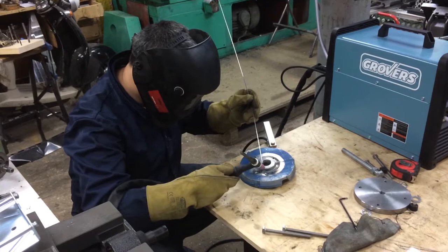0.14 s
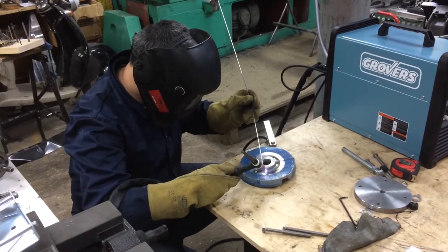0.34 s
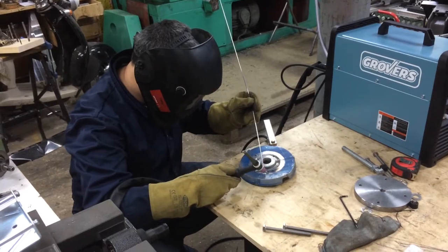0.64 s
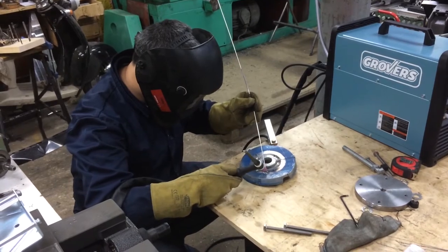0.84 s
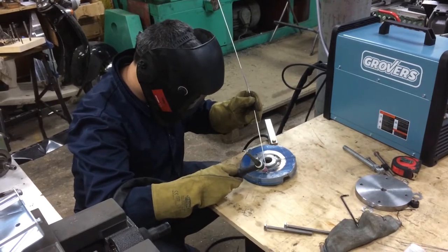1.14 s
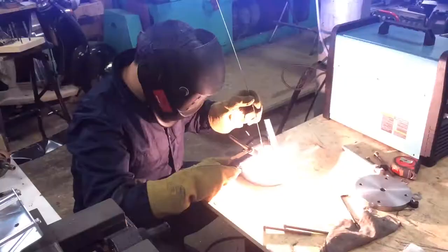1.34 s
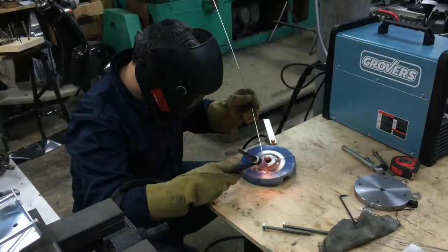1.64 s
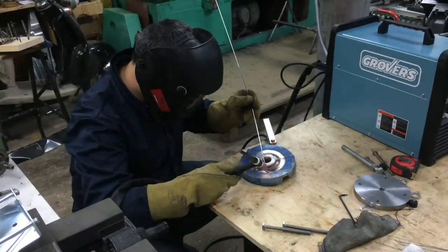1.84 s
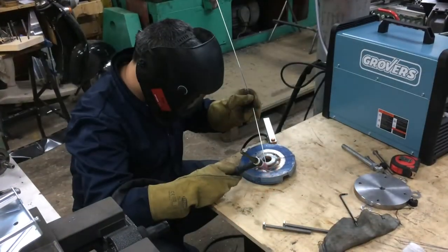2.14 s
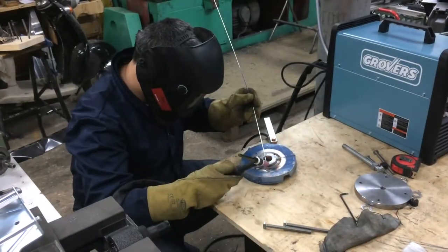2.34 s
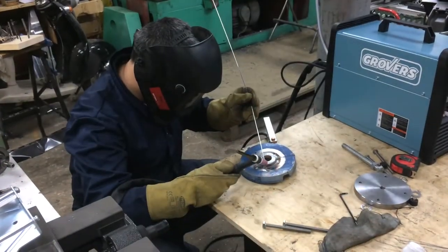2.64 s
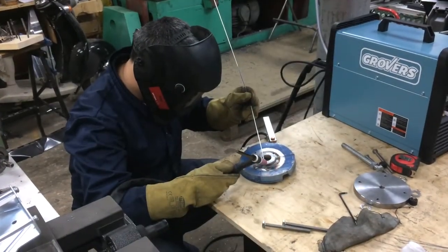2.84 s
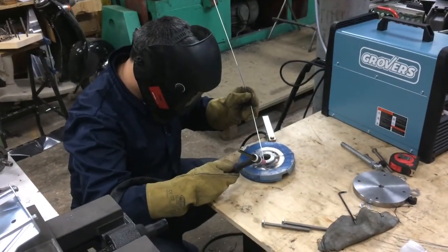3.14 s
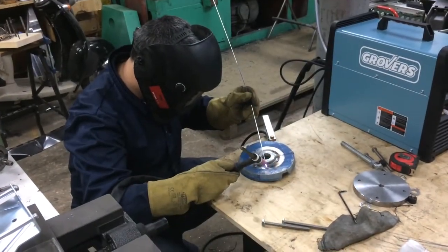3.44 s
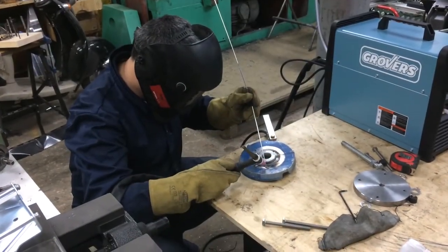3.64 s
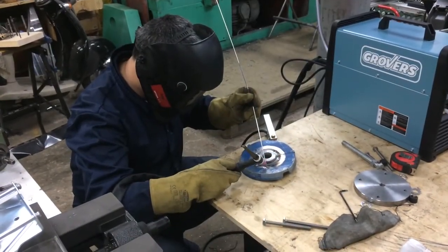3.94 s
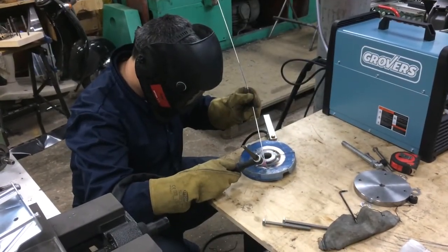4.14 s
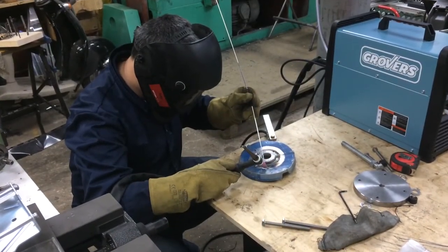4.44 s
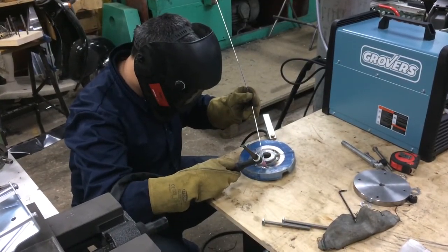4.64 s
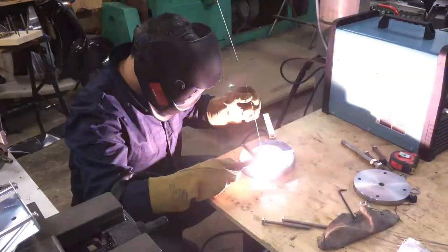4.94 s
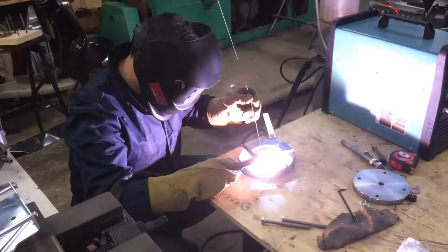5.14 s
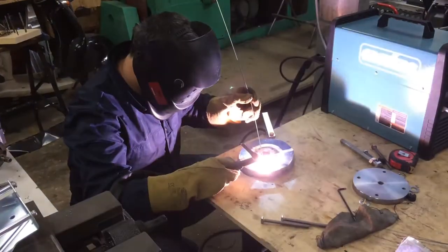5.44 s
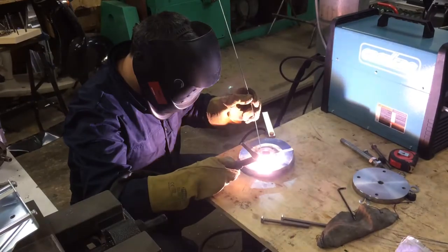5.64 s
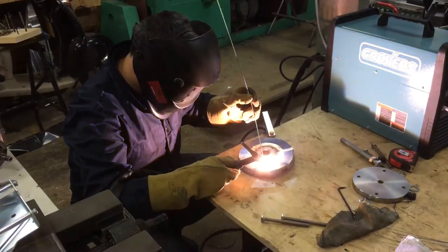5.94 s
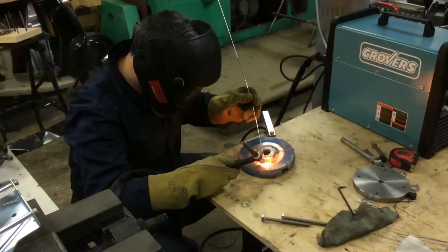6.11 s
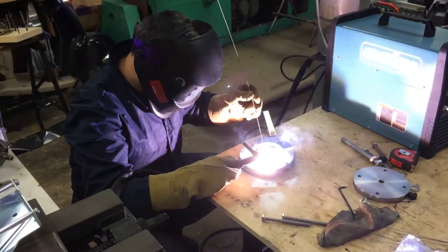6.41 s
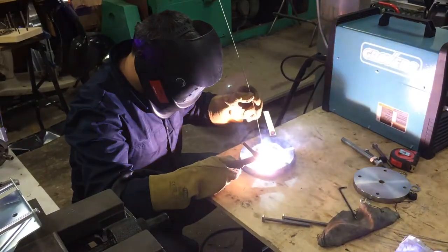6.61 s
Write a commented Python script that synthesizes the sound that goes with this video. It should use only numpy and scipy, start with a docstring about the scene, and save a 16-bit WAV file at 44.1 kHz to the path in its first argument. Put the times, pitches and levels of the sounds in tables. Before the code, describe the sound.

A welding machine's fan rushes softly with a low steady hum throughout, in a workshop with short reflections. From the start a thin, high igniter fizz pulses rapidly, and at 0.67 s eleven sharp bright sparks rattle out in under 0.2 s, leaving a faint low boom. A tick comes at 1.3 s; at 1.65 s an arc flares and sputters in low, ringing pops for a tenth of a second, then dies. Fizz returns at 1.8-2.0 s and 2.9-3.9 s, with a second spark rattle at 3.76 s. Near-quiet follows until a dull spit at 5.1 s and a hissing flare at 5.16 s. At 5.34 s the arc swells into a loud, raspy 70-per-second buzz with nasal ringing around 1-1.5 kHz, hiss and growing snaps. It breaks at 6.4 s, leaving faint whistling ticks, bursts back brighter at 6.58 s, and cuts out at 6.82 s.

```python
"""A workshop bench with a TIG welder, one microphone nearby; the cooling fan and a steady hum run throughout.
The igniter fizzes as bursts of bright noise and twice throws a string of sparks, each a single shock.
A first arc flares up, sputters in low ringing pops and dies. Then the arc catches with a hiss of noise and
buzzes on alternating current: each reversal kicks the gas, snaps and rings the power stage.
It sinks to a low current for a moment and returns. Ticks, spits and echoes off bench and room surround it."""
import sys
import numpy as np
from scipy import signal
from scipy.fft import rfft, irfft
from scipy.io import wavfile
from scipy.ndimage import uniform_filter1d

SR = 44100
rng = np.random.default_rng(int(sys.argv[2]) if len(sys.argv) > 2 else 0)


def store_wav(level_fs):
    """Save 16-bit WAV to argv[1]."""
    pcm = np.round(np.clip(np.atleast_2d(level_fs), -1, 1) * 32767)
    wavfile.write(sys.argv[1], SR, pcm.T.astype(np.int16))


N = 298557  # length in samples

# Burns at full current. Each row: start in seconds, end in seconds, swell in seconds, buzz in dB, snap in dB.
BURNS = [(5.344, 6.408, 0.063, 1.08, -40.5), (6.575, 6.82, .004, 2.5, -38.5)]
# Brief surges and dips of the buzz. Each row: middle in seconds, half length in seconds, change in dB.
SURGES = [(5.42, 0.031, 3), (5.715, 0.024, 1.5), (5.81, 0.08, -2), (6.04, 0.054, 2.2), (6.611, .007, -5.5)]
# Resonances that colour the buzz. Each row: centre in Hz, width in Hz, level in dB.
BUZZ_MODES = [(614, 57, -16.5), (930, 80, 0.5), (1150, 63.5, 2), (1478, 39.7, 4), (1952, 73, -3.5),
              (2214, 23, -6.5), (3560, 190, -26)]
# Spectrum of the stirred shielding gas. Each row: frequency in Hz, relative density in dB per Hz.
TURBULENCE_COLOUR = [(40, -31), (200, -5.5), (400, 0), (700, 2.5), (1050, 13.5), (2000, -13), (4000, -30),
                     (12000, -48)]
# Spectrum of the relighting snaps. Each row: frequency in Hz, relative density in dB per Hz.
SNAP_COLOUR = [(60, -58), (600, -34), (2000, 6), (3400, 0.5), (4200, -4), (5500, 0), (7500, -0.5),
               (9000, -1.5), (10500, 0.5), (13000, -1.5), (15000, -10)]
# Whistles of the power stage. Each row: centre in Hz, width in Hz, relative level in dB.
INVERTER_MODES = [(1200, 620, -8.5), (5274, 19, 9.5), (5740, 81, -5), (5910, 130, -6.5), (7100, 88, -10),
                  (7970, 170, -12), (10000, 740, -17)]
# The arc strikes or flares, and hisses. Each row: start in seconds, end in seconds, hiss in dB,
# extra flare at the strike in dB, time constant of the flare in seconds.
STRIKES = [(1.650, 1.735, -43.5, 5, 0.0097), (5.163, 5.317, -38, 7.5, 0.035),
           (5.307, 6.398, -37.5, 10, 0.024), (6.576, 6.8, -34.5, 16.5, 0.029)]
# Spectrum of the hiss. Each row: frequency in Hz, relative density in dB per Hz.
HISS_COLOUR = [(30, -32), (150, -4), (450, 2), (1400, 6), (2600, -2), (3600, -0.5), (4500, -5.5),
               (7000, -1), (8700, -4.5), (10800, -1.5), (15000, -5.5)]
# Strings of sparks jumping from electrode to work. Each row: first spark in seconds, spacing in seconds,
# level in dB.
SPARK_STRINGS = [(.6735, .0159, 5.7), (3.7588, .0162, 5.2)]
# Spectrum of a spark. Each row: frequency in Hz, relative density in dB per Hz.
SPARK_COLOUR = [(30, -41.5), (300, -5.5), (800, -4.5), (1800, -4), (2400, -9.5), (3400, -4.5), (4500, -7.5),
                (7000, -2.5), (8800, -5.5), (11000, 0.5), (14500, -1.5), (16000, -6.5)]
# Spells of the igniter running. Each row: start in seconds, end in seconds.
IGNITER_ON = [(0, .84), (1.805, 2.035), (2.905, 3.925)]
# Spectrum of the igniter's fizz. Each row: frequency in Hz, relative density in dB per Hz.
IGNITER_COLOUR = [(1500, -18.5), (4500, -6.5), (6500, -0.5), (8000, -5.5), (10000, -2), (11300, -3),
                  (12700, 3), (15000, -6.5)]
# Single gas pops of the flaring arc. Each row: start in seconds, level in dB, pitch in Hz.
POPS = [(1.674, -15, 390), (1.682, -17.5, 310), (1.700, -9.5, 840), (1.744, -12.5, 1030), (1.752, -25, 170),
        (1.753, -27.5, 91)]
# The span of the sputter: start and end in seconds.
SPUTTER_S = (1.675, 1.738)
# Sharp ticks at the torch. Each row: start in seconds, level in dB, centre in Hz, 60 dB decay in seconds.
TICKS = [(.218, -50.5, 5500, .04), (1.308, -33.5, 10900, 0.034), (1.560, -43, 7150, 0.026),
         (1.651, -37, 12000, .028), (1.728, -39, 9000, 0.014), (2.883, -55, 6000, 0.037),
         (4.289, -61.5, 5600, 0.24), (5.089, -60, 10500, .1)]
# Dull spits of gas as the arc catches or fails. Each row: start in seconds, level in dB, centre in Hz,
# 60 dB decay in seconds.
SPITS = [(1.309, -31, 1370, 0.032), (1.676, -30, 980, 0.37), (1.743, -30.5, 1400, 0.027),
         (5.089, -34, 1120, 0.14), (5.163, -55, 1980, 0.041), (5.317, -24, 1430, 0.095),
         (6.399, -29, 1840, 0.065)]
# Spectrum of the fan's rushing air. Each row: frequency in Hz, relative density in dB per Hz.
FAN_AIR = [(20, -27), (45, -5.5), (65, -11.5), (110, -4.5), (220, -1), (400, -5), (520, -4.5), (800, -5.5),
           (1300, -14.5), (2000, -16.5), (2800, -28), (3600, -27), (4400, -37.5), (6500, -37.5),
           (8000, -41.5), (15000, -47.5)]
# Fan tones and casing resonances. Each row: centre in Hz, width of each filter pass in Hz, level in dB.
FAN_MODES = [(144.5, 11, -48), (207.2, 23, -49), (247.5, 25.6, -44), (306, 16.3, -40), (939, 37, -48.5),
             (1039, 152, -47), (1468, 150, -53.5), (1850, 120, -60.5)]
# Reflections from the bench and the casing: delays in seconds.
ECHO_S = [.00185, .0028]
# Strengths of the same reflections in dB.
ECHO_DB = [-9, -14]

# reversals of the current: cycles per second, the moment of one reversal, length of the short half-wave
AC_HZ, REVERSAL_AT_S, HALF_WAVE_S = 69.998, 5.4127, .00278
CASING_ECHO_S = .00288
SWELL_DB, SAG_DB_PER_S = 15, 10  # the buzz swells by this much and sinks steadily
SNAP_RISE_DB, SNAP_RISE_S = 24, 0.052  # the snaps grow in at the start of a burn
BREAK_DB, BREAK_S = 15, 0.021  # and turn hard just before it breaks off
SETTLE_S = 0.08  # time constant of a young arc settling
# a young arc kicks softly and unevenly, and stirs the gas more
YOUNG_DULL_DB_PER_OCTAVE, DULL_ABOVE_HZ = 19, 1110
YOUNG_UNEVEN_DB, YOUNG_TURBULENCE_DB = 3, 13
HISS_RELEASE_DB_PER_S = 600
LOW_CURRENT_HISS_DB = -44  # between the two burns
SPARKS_PER_STRING, SPARK_JITTER_S = 11, .0004
COLD_GAP_DB, GAP_WARMS_S = -2.5, .03  # a string starts weaker
MISFIRE_INDEX, MISFIRE_DB = 2, -11.5  # and its third spark misfires
IGNITER_HZ = 62.8  # bursts per second
SPUTTER_DB, SPUTTER_FADE_DB_PER_S = -17.5, 64
SPUTTER_LOW_HZ, SPUTTER_HIGH_HZ = 333, 940
TICK_SPREAD, SPIT_SPREAD = 1, 0.55  # width of each filter pass as a share of its centre
ROOM_T60_S, TREBLE_T60_S, CLUTTER_T60_S = .42, 0.18, 0.026
CUTOFF_HZ = 15500


def arc_buzz(turbulence_db=-37, uneven_db=0.9, echo_share=0.47):
    """At each reversal the hot gas shrinks and swells again: a kick that rings in a few resonances."""
    s, sizes = reversals(first_share=0.69, uneven_db=uneven_db)
    buzz_gain, _ = burn_levels(s)
    young_uneven_db = YOUNG_UNEVEN_DB * youth(s) * rng.standard_normal(len(s))
    sizes = sizes * buzz_gain * from_db(surge(s) + young_uneven_db)
    kicks = clicks(s, sizes) + echo_share * clicks(s + CASING_ECHO_S, sizes)
    rings, young = 0, youth(np.arange(N) / SR)
    for k, (hz, width, db) in enumerate(BUZZ_MODES):
        octaves_above = max(np.log2(hz / DULL_ABOVE_HZ), 0)
        softened = kicks * from_db(-YOUNG_DULL_DB_PER_OCTAVE * young * octaves_above)
        polarity = (-1) ** k
        rings = rings + polarity * from_db(db) * resonance(softened, hz, width)
    # every kick also stirs the shielding gas for a few milliseconds
    stirred = signal.lfilter([.1], [1, -.995], kicks) * rng.standard_normal(N)
    turbulence_gain = from_db(turbulence_db + YOUNG_TURBULENCE_DB * young)
    buzz = rings + turbulence_gain * coloured(stirred, TURBULENCE_COLOUR)
    return workshop(buzz, clutter_db=-42, room_db=-13)


def arc_snaps():
    """The arc relights after each reversal with a sharp snap of uneven strength."""
    s, sizes = reversals(first_share=1.05, uneven_db=2.2)
    _, snap_gain = burn_levels(s)
    snaps = clicks(s, sizes * snap_gain)
    return workshop(bench(coloured(snaps, SNAP_COLOUR)), clutter_db=1.5, room_db=-2.5)


def reversals(first_share, uneven_db):
    """The current reverses twice a cycle, around a short half-wave: times and sizes (unit power as clicks)."""
    period = round(SR / AC_HZ) / SR  # whole samples
    cycles = np.arange(REVERSAL_AT_S % period, N / SR, period)
    s = np.concatenate([cycles, cycles + HALF_WAVE_S])
    unevenness = from_db(uneven_db * rng.standard_normal(len(s)))
    sizes = np.repeat([first_share, 1], len(cycles)) * unevenness
    return s, sizes * np.sqrt(N / np.sum(sizes ** 2))


def burn_levels(s):
    """Gains of buzz and snap at the times s: each burn swells, sags slowly and ends in hard snaps."""
    buzz, snap = 0, 0
    for start, end, swell_s, buzz_db, snap_db in BURNS:
        on = within([(start, end)], s)
        age, left = np.maximum(s - start, 0), np.maximum(end - s, 0)
        swell_db = -SWELL_DB * np.maximum(1 - age / swell_s, 0)
        buzz = buzz + on * from_db(buzz_db + swell_db - SAG_DB_PER_S * age)
        rise_db = -SNAP_RISE_DB * np.maximum(1 - age / SNAP_RISE_S, 0)
        break_db = BREAK_DB * np.exp(-left / BREAK_S)
        snap = snap + on * from_db(snap_db + rise_db + break_db)
    return buzz, snap


def youth(s):
    """1 as a burn begins, falling towards 0 as the arc settles."""
    return sum((s >= burn[0]) * np.exp(-np.maximum(s - burn[0], 0) / SETTLE_S) for burn in BURNS)


def surge(s):
    """Brief rises and dips of the buzz at the times s, in dB."""
    return sum(db * np.exp(-((s - at) / half_s) ** 2) for at, half_s, db in SURGES)


def arc_hiss(grain_db=3, swell_db=6):
    """The arc spot skips over the metal in tiny discharges; in a burn their level swings with the current cycle."""
    t = np.arange(N) / SR
    burning = within([burn[:2] for burn in BURNS], t)
    swell = burning * np.sin(2 * np.pi * AC_HZ * (t - REVERSAL_AT_S))
    grains = rms_one(rng.standard_normal(N) * from_db(grain_db * rng.standard_normal(N)))
    hiss = coloured(grains * hiss_level(t) * from_db(swell_db * swell), HISS_COLOUR)
    return workshop(bench(hiss), clutter_db=-10, room_db=-10)


def hiss_level(t):
    """Gain of the hiss: it flares at each strike, settles, and falls away when the current drops."""
    gain = within([(BURNS[0][1], BURNS[1][0])], t) * from_db(LOW_CURRENT_HISS_DB)
    for start, end, db, flare_db, flare_s in STRIKES:
        flare = flare_db * np.exp(-np.maximum(t - start, 0) / flare_s)
        release = HISS_RELEASE_DB_PER_S * np.maximum(t - end, 0)
        gain = np.maximum(gain, (t >= start) * from_db(db + flare - release))
    return gain


def inverter(level_db=-23):
    """The power stage rings at every reversal from the first burn on, even while the current is low."""
    s, sizes = reversals(first_share=.9, uneven_db=1.2)
    ticks = clicks(s, sizes * (s > BURNS[0][0]))
    whistles = sum(from_db(db) * resonance(ticks, hz, width) for hz, width, db in INVERTER_MODES)
    return from_db(level_db) * workshop(whistles, clutter_db=-12, room_db=-10)


def sparks(uneven_db=1.0):
    """Each spark is a single bright shock; they come in even strings and strengthen as the gap warms."""
    train, order = 0, np.arange(SPARKS_PER_STRING)
    for start, spacing, db in SPARK_STRINGS:
        age = order * spacing
        late, strong = rng.standard_normal((SPARKS_PER_STRING, 2)).T
        cold_db = COLD_GAP_DB * np.exp(-age / GAP_WARMS_S)
        misfire_db = MISFIRE_DB * (order == MISFIRE_INDEX)
        spark_db = db + cold_db + misfire_db + uneven_db * strong
        train = train + clicks(start + age + SPARK_JITTER_S * late, -from_db(spark_db))
    return workshop(bench(coloured(train, SPARK_COLOUR)), clutter_db=-8, room_db=-7.5)


def igniter(level_db=-56, duty=0.523):
    """The spark gap inside the welder fizzes in short regular bursts."""
    t = np.arange(N) / SR
    firing = within(IGNITER_ON, t) * ((t * IGNITER_HZ) % 1 < duty)
    fizz = coloured(firing * rng.standard_normal(N), IGNITER_COLOUR)
    return from_db(level_db) * workshop(fizz, clutter_db=-2.5, room_db=0.5)


def pops(rise_cycles=.9):
    """Puffs of hot gas, each a low ring that swells and dies in a few cycles."""
    out, t = 0, np.arange(N) / SR
    for s, db, hz in list(POPS) + sputter():
        turns = np.clip((t - s) * hz, 0, 20 * rise_cycles)
        envelope = turns / rise_cycles * np.exp(1 - turns / rise_cycles)
        out = out + from_db(db) * np.sin(2 * np.pi * turns) * envelope
    return workshop(out, clutter_db=-8, room_db=-6)


def sputter(count=9, uneven_db=1.0, jitter_s=0.0018, pitch_spread=0.13):
    """A quick, fading run of pops, high and low in turn: rows of start in seconds, dB, pitch in Hz."""
    late, strong, sharp = rng.standard_normal((count, 3)).T
    s = np.linspace(*SPUTTER_S, count) + jitter_s * late
    db = SPUTTER_DB - SPUTTER_FADE_DB_PER_S * (s - SPUTTER_S[0]) + uneven_db * strong
    hz = np.resize([SPUTTER_HIGH_HZ, SPUTTER_LOW_HZ], count) * np.exp(pitch_spread * sharp)
    return list(zip(s, db, hz))


def cracks(events, spread):
    """Ticks or spits: bursts of dying noise, each passed twice through its own band."""
    out = np.zeros(N + SR)
    for s, db, hz, t60 in events:
        at, width = round(s * SR), spread * hz
        burst = resonance(resonance(dying_noise(t60), hz, width), hz, width)
        # make up for the power lost outside the band
        out[at:at + SR] += from_db(db) * burst * np.sqrt(SR / width / 2)
    return workshop(out[:N], clutter_db=7, room_db=-3)


def low_boom(start_s=.755, level_db=-42, hz=76, t60=1.8):
    """A faint low boom, a dying sine, hangs on after the first sparks."""
    age = np.maximum(np.arange(N) / SR - start_s, 0)
    return from_db(level_db) * np.sin(2 * np.pi * hz * age) * np.exp(-np.log(1000) * age / t60)


def hum(level_db=-42, hz=294.7, load_db=5):
    """The welder's steady hum, a sine that is louder once it drives the arc."""
    t = np.arange(N) / SR
    load = uniform_filter1d(1. * (t > BURNS[0][0]), size=4000)
    return from_db(level_db + load_db * load) * np.sqrt(2) * np.sin(2 * np.pi * hz * t)


def fan(air_db=-40.0):
    """Rushing air with wavering blade tones and casing resonances, all filtered noise."""
    out = from_db(air_db) * coloured(rng.standard_normal(N), FAN_AIR)
    for hz, width, db in FAN_MODES:
        tone = resonance(resonance(rng.standard_normal(N + SR), hz, width), hz, width)
        out = out + from_db(db) * rms_one(tone[SR:])  # the first second lets the tone build up
    return out


def bench(x):
    """Small hard surfaces near the torch repeat the treble of every sharp sound."""
    treble = signal.sosfilt(signal.butter(1, 4000, "high", fs=SR, output="sos"), x)
    echoes = 0
    for s, db in zip(ECHO_S, ECHO_DB):
        echoes = echoes + from_db(db) * np.pad(treble, (round(s * SR), 0))[:N]
    return x + echoes


def workshop(x, clutter_db, room_db):
    """Direct sound, quick scatter from the things on the bench, and a room tail whose treble dies first."""
    below, above = (signal.butter(2, 5000, side, fs=SR, output="sos") for side in ("low", "high"))
    clutter = dying_noise(CLUTTER_T60_S)
    tail = signal.sosfilt(below, dying_noise(ROOM_T60_S)) + signal.sosfilt(above, dying_noise(TREBLE_T60_S))
    scatter = from_db(clutter_db) * clutter / np.linalg.norm(clutter)
    room = from_db(room_db) * tail / np.linalg.norm(tail)
    return x + signal.fftconvolve(x, scatter + room)[:N]


def dying_noise(t60):
    """One second of noise that dies away, starting at rms 1."""
    return rng.standard_normal(SR) * from_db(-60 * np.arange(SR) / SR / t60)


def coloured(x, spectrum, size=8192):
    """Causal (minimum-phase) filter of unit energy with the given spectrum."""
    hz, db = np.transpose(spectrum)
    grid = np.linspace(1, SR / 2, size // 2 + 1)
    gain = from_db(np.interp(np.log(grid), np.log(hz), db))
    cepstrum = irfft(np.log(gain))
    # doubling the causal half of the cepstrum gives minimum phase
    response = irfft(np.exp(rfft(2 * cepstrum[:size // 2], size)))
    return signal.fftconvolve(x, response / np.linalg.norm(response))[:N]


def resonance(x, hz, width_hz):
    """Two-pole band-pass with gain 1 on top."""
    r = np.exp(-np.pi * width_hz / SR)
    feedback = [1, -(1 + r * r) * np.cos(2 * np.pi * hz / SR), r * r]
    return signal.lfilter([(1 - r * r) / 2, 0, -(1 - r * r) / 2], feedback, x + 1e-18)


def clicks(s, sizes):
    """One impulse at each of the times s."""
    out, at = np.zeros(N), np.round(np.asarray(s) * SR).astype(int)
    inside = at < N
    np.add.at(out, at[inside], (sizes * np.ones(len(at)))[inside])
    return out


def within(spans, s):
    """True where the times s fall in one of the spans."""
    return np.any([(s >= start) & (s < end) for start, end in spans], axis=0)


def from_db(db):
    """Decibels to gain."""
    return 10 ** (np.asarray(db) / 20)


def rms_one(x):
    """Scale to unit power."""
    return x / np.sqrt(np.mean(x ** 2) + 1e-20)


def scene():
    """Everything reaches one microphone near the bench."""
    welding = arc_buzz() + arc_snaps() + arc_hiss() + inverter()
    crackle = cracks(TICKS, TICK_SPREAD) + cracks(SPITS, SPIT_SPREAD)
    striking = sparks() + igniter() + pops() + crackle + low_boom()
    return (welding + striking + hum() + fan())[None]


def record(dry):
    """The microphone drops the deep bass and the top is cut steeply."""
    bass_cut = signal.butter(3, 38, "high", fs=SR, output="sos")
    top_cut = signal.ellip(10, .1, 80, CUTOFF_HZ, fs=SR, output="sos")
    return signal.sosfilt(top_cut, signal.sosfilt(bass_cut, dry))


dry = scene()
out = record(dry)
store_wav(out)
```